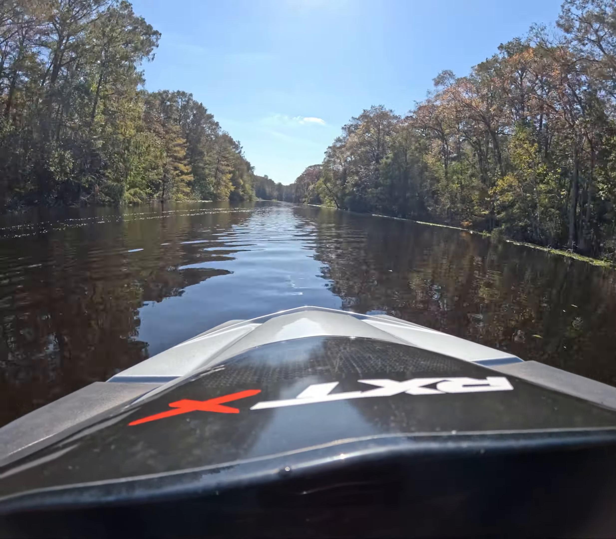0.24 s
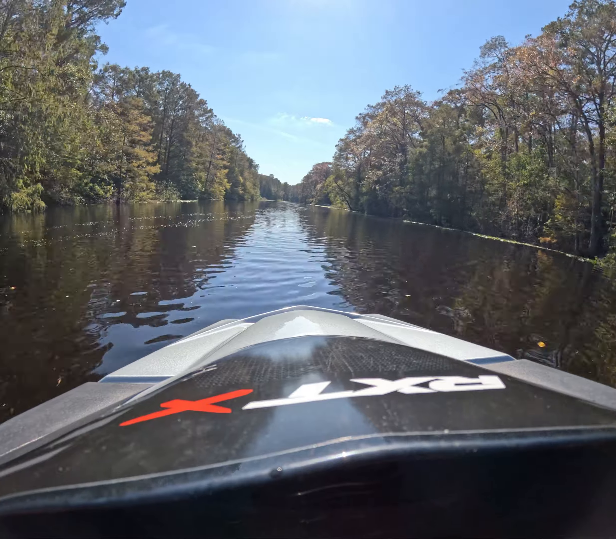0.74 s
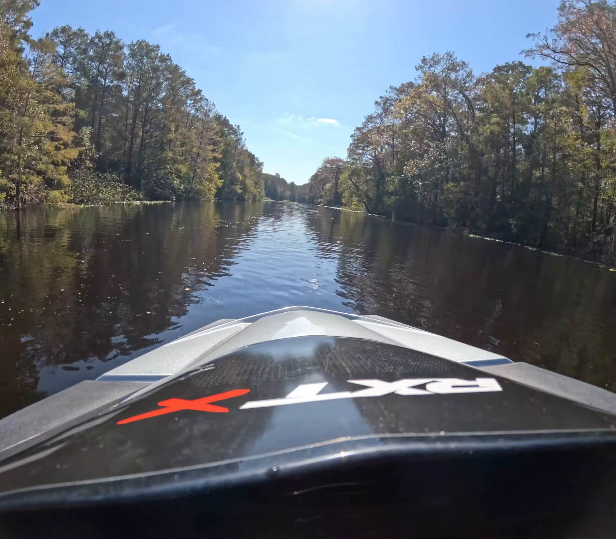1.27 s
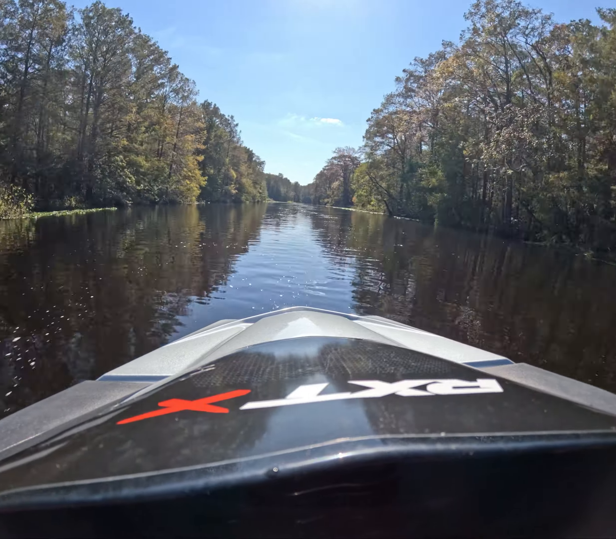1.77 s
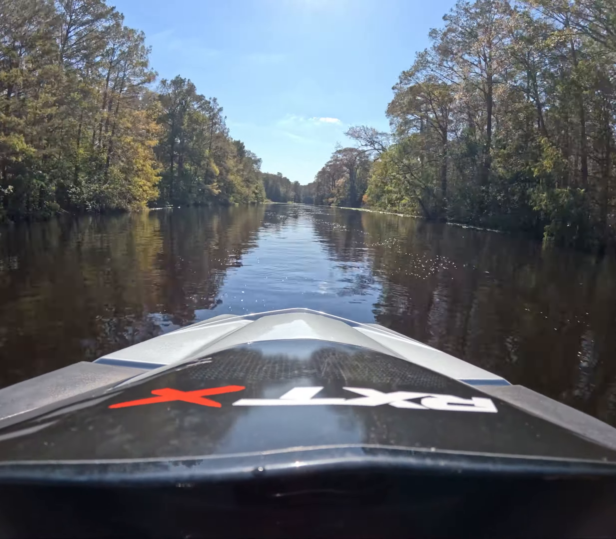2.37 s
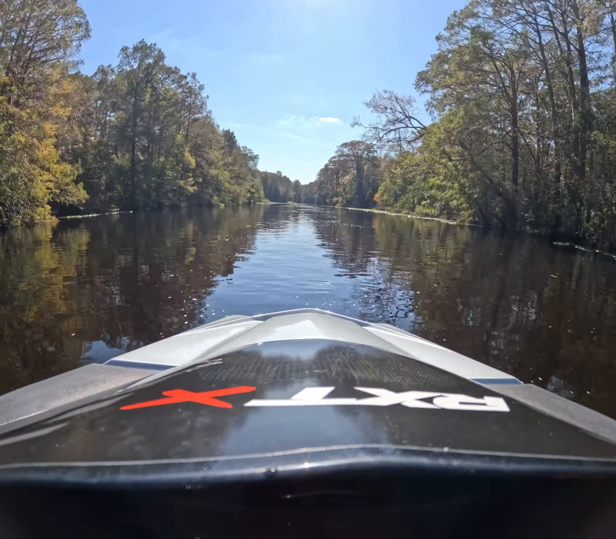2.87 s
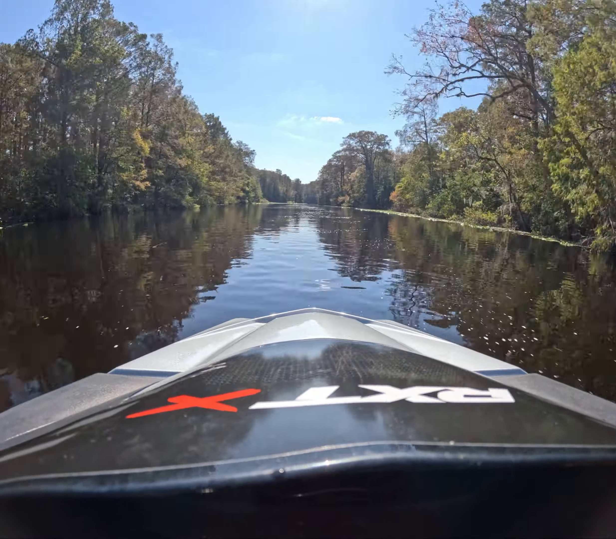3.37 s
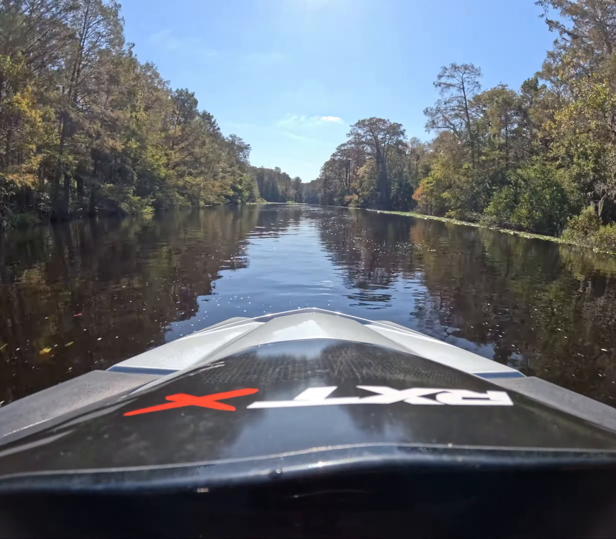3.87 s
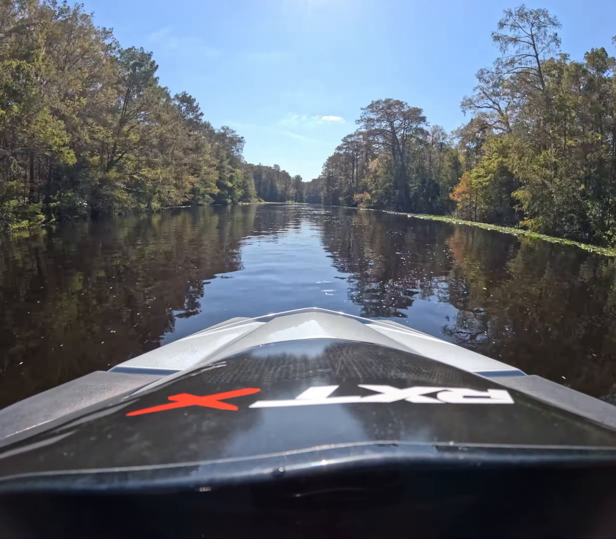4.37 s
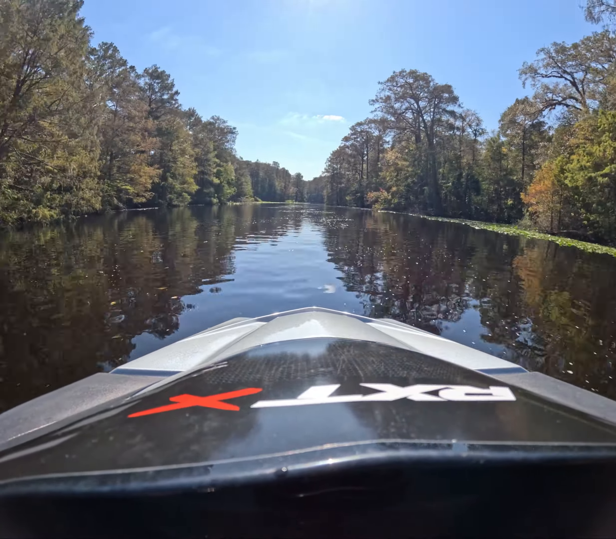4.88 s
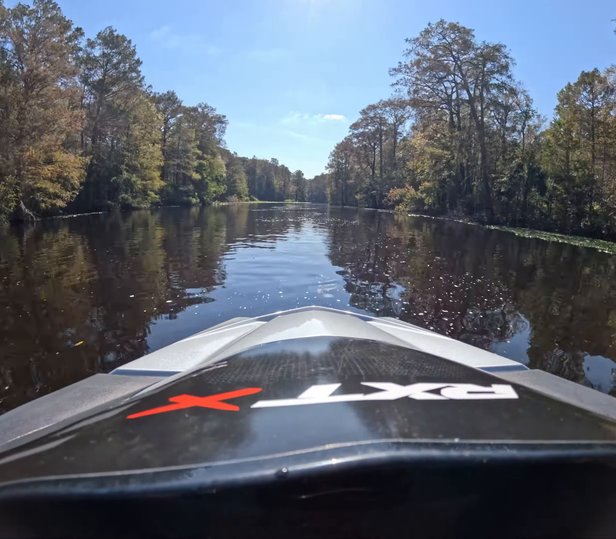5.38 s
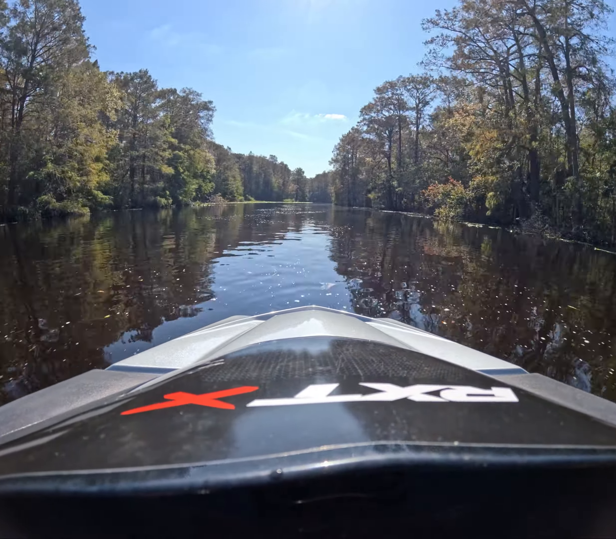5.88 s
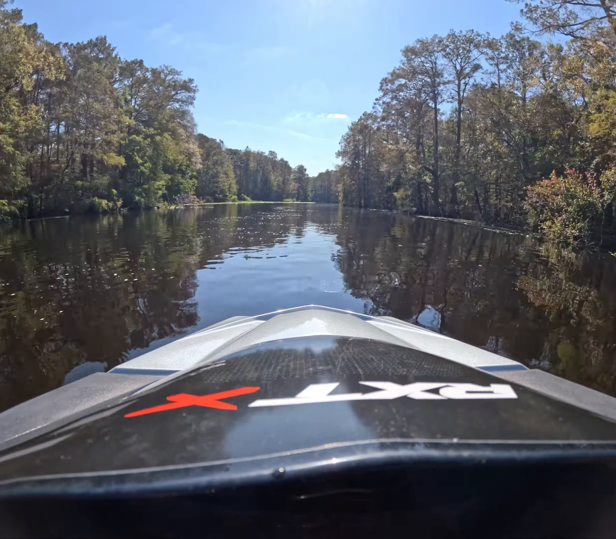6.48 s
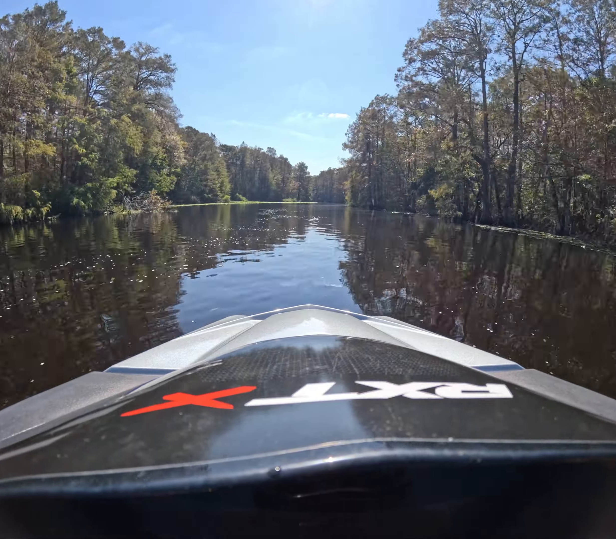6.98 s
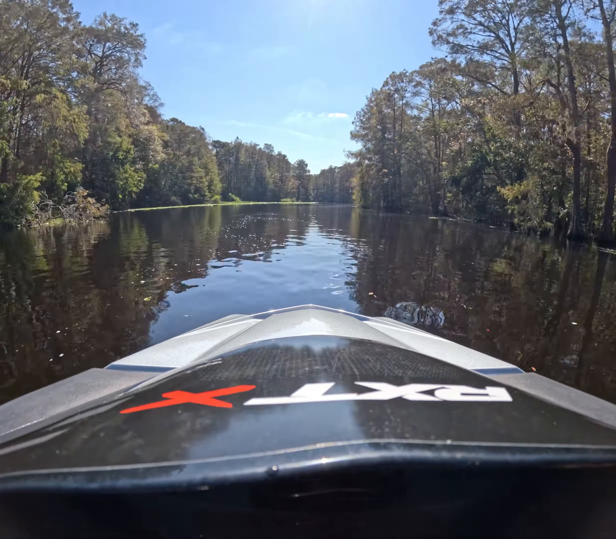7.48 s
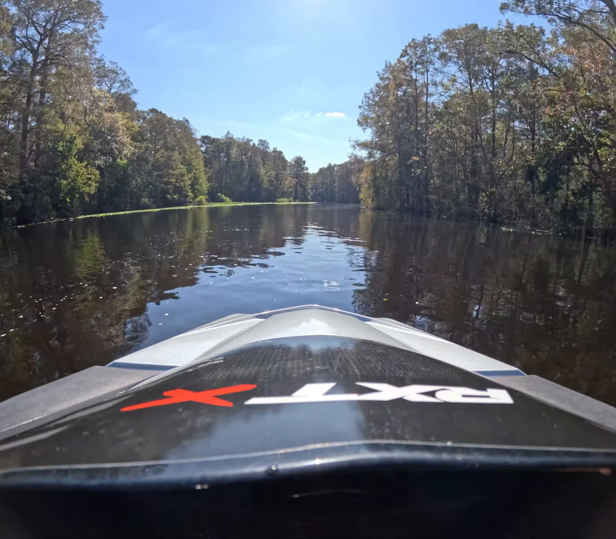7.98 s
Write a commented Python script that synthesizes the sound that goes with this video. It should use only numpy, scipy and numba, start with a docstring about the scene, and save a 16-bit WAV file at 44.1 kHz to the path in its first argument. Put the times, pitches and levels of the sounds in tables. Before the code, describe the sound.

On the deck of a small watercraft moving along a calm river, a close camera microphone hears constant wind buffeting, dull hull drumming, mid-toned rushing water and faint hissing spray. A steady low engine hum sags after two seconds, wavers and recovers, partly masked. Near the end the rush thins, then swells back with a hollow tone as the engine pitch rises slightly. The sound is dense, compressed and level throughout.

```python
"""A jet-driven watercraft planes along a calm river, heard by a small camera fixed to its deck.
From the start, noise bands give wind buffeting, hull drumming, rushing water and spray over the engine.
The engine, a harmonic series, holds near 138 Hz, sags after 2 s and recovers; low hums swell and sink.
From 6.5 s the rush thins, then rises again with a hollow note while the firing rate climbs to 150 Hz.
A fast limiter holds the level throughout."""
import sys
import numpy as np
from scipy import signal
from scipy.fft import rfft, irfft, next_fast_len
from scipy.io import wavfile
from scipy.ndimage import uniform_filter1d
from numba import njit

SR = 44100
rng = np.random.default_rng(int(sys.argv[2]) if len(sys.argv) > 2 else 0)


def store_pcm(level_fs):
    """Save levels as 16-bit WAV."""
    pcm = np.round(np.clip(level_fs, -1, 1) * 32767).astype(np.int16)
    wavfile.write(sys.argv[1], SR, np.atleast_2d(pcm).T)


N = 362943

# All source levels below stand ahead of the input gain in record().
# wind in the microphone port and water on the hull: start_s, buffet_db, drumming_db
WIND_LEVELS = [(0, -22, -23), (1.8, -18.5, -18.5), (2.1, -17, -19), (2.5, -16.5, -21), (2.9, -17, -17.5),
               (3.25, -22, -17), (3.8, -20.5, -18), (5.3, -20, -18), (6.2, -19, -20.5), (6.6, -24.5, -20),
               (7.1, -20, -16), (7.6, -21, -19), (8.23, -19.5, -18.5)]
# water rushing past: start_s, level_db, brightness_db_per_octave
RUSH_LEVELS = [(0, -20, -0.5), (2, -17.5, 0.16), (3.5, -20, 0.9), (4.5, -19, 1), (5.5, -18.5, -0.66),
               (6.47, -19.5, -1.3), (6.56, -22.5, 1), (6.75, -23, 0.5), (6.9, -24, -2.5), (7.05, -24, -1),
               (7.2, -21, -1), (7.35, -21, -1), (7.5, -17, -2), (7.8, -19, -2), (8.23, -17, -2.5)]
# spray: start_s, level_db, brightness_db_per_octave
SPRAY_LEVELS = [(0, -37.5, 2), (.25, -33.5, 0.6), (.55, -27.5, -0.5), (.8, -29.5, 0.5), (1.0, -28, 0),
                (1.25, -30, 0.5), (1.5, -27.5, -0.3), (2.1, -31.5, -0.5), (2.7, -32, -1.5),
                (3.3, -34, -0.3), (3.8, -31, -1), (4.25, -30.5, 0), (4.8, -32.5, -1), (5.3, -32.5, -0.9),
                (6.1, -37, 0.5), (6.33, -38.5, 1.3), (6.45, -33.5, 0), (6.7, -30.5, 0), (6.95, -33, 1),
                (7.2, -31.5, 2), (7.4, -32.5, 0.5), (7.55, -38, 2), (8.23, -36, -0.5)]
# hollow note, a band of the rush added back to it: start_s, band_gain_db
HOLLOW_GAIN = [(0, -25.5), (6.6, -24), (6.9, -7), (7.3, -6), (7.5, -6), (7.65, -10), (7.9, -11),
               (8.23, -20)]
# spectral shapes of the four noises before tilting: frequency_hz, relative_level_db
BUFFET_SPECTRUM = [(12, -20), (25, -6.5), (45, -3), (70, -0.5), (110, -3.5), (170, -13.5), (400, -32.5)]
DRUMMING_SPECTRUM = [(50, -15.5), (110, -2), (170, -0.5), (280, -2.5), (380, -8), (800, -32.5)]
RUSH_SPECTRUM = [(120, -18), (300, -3.5), (450, 0), (850, -0.5), (1300, -3), (1800, -9.5), (2600, -22),
                 (4500, -50)]
SPRAY_SPECTRUM = [(600, -18.5), (1400, -2), (2000, -0.5), (3200, -7.5), (4200, -17), (6000, -28),
                  (7600, -35), (8600, -32), (9400, -37), (11000, -44.5), (13000, -57), (15000, -64.5)]
# engine: start_s, mean_firing_rate_hz, tone_db, octave_db, overtone_base_db, rate_waver_percent
ENGINE_COURSE = [(0, 135.8, -20, -33, -38, 0.4), (.5, 137, -20, -31.5, -30, 0.5),
                 (1.1, 137.9, -19, -33.5, -29.5, 0.5), (1.35, 138, -19.5, -32.5, -36, 0.48),
                 (1.93, 138, -20.5, -35, -37, .8), (2.12, 115.3, -23.5, -40, -41, 3.5),
                 (2.3, 90.8, -31, -43, -43, 5.9), (2.65, 100, -31, -45, -49, 8),
                 (2.85, 138, -26, -38, -36, 4.2), (3.2, 138.2, -26, -39, -37, 1.96),
                 (3.6, 138.1, -31, -41, -46, 1), (4.1, 136.9, -24, -35, -34, 1.02),
                 (4.55, 134.6, -25, -36, -36, 1.54), (4.8, 136, -34, -36, -35, 1.97),
                 (5.3, 137.9, -28, -34, -43, 2), (5.8, 139.5, -33, -38.5, -45, 2.21),
                 (6.4, 140.7, -31, -31, -37, 1.93), (6.8, 142.3, -21.5, -31, -38, 1.06),
                 (7.05, 144.8, -21.5, -35, -35, 0.83), (7.3, 146.9, -22.5, -29.5, -37, 0.83),
                 (7.6, 148.3, -25, -30, -29, 1), (7.8, 149.6, -30, -36, -33, 1.57),
                 (8.23, 145.6, -43.5, -36, -36, 1.4)]
# other overtones: multiple_of_firing_rate, level_above_base_db; halves come from unequal exhaust strokes
ENGINE_OVERTONES = [(1.5, -3.5), (3, -4), (3.5, -9), (4, -5.5), (4.5, -4.5), (5, -6), (6, -11)]
# brief low hums in the rumble: centre_s, mean_pitch_hz, peak_level_db, half_length_s (fall to 1/e)
LOW_HUMS = [(2.55, 63.7, -32, .1), (2.72, 56.9, -27, 0.065), (2.92, 78, -27, 0.094),
            (4.251, 121.6, -27, .08), (5.397, 165.2, -22, 0.14), (5.751, 92.3, -20.5, .12),
            (6.2, 105.1, -24, .15), (6.651, 167.4, -19, 0.11), (7.549, 214.1, -25, 0.087)]

DRUM_BRIGHT_DB = -0.6  # per octave
HOLLOW_HZ, HOLLOW_WIDTH_HZ = 820, 200
INPUT_GAIN_DB, LIMIT_DB, LIMIT_RATIO = 3.5, -14, 2.87
ATTACK_S, RELEASE_S = 0.0016, 0.016
ROUNDING = 0.54  # drive of the soft saturation
TOP_HZ = 14800


def undb(db):
    """Level to amplitude: 20 dB is a factor of ten."""
    return 10 ** (np.asarray(db) / 20)


def curves(table):
    """Linear interpolation in time: each column of a table becomes one value per sample."""
    s, *columns = np.transpose(table)
    return [np.interp(np.arange(N) / SR, s, column) for column in columns]


def walk(rate_hz):
    """Band-limited fluctuation: random steps at the given rate, slewed twice, with unit spread."""
    hold = max(int(SR / rate_hz), 2)
    steps = np.repeat(rng.standard_normal(N // hold + 1), hold)
    smooth = uniform_filter1d(uniform_filter1d(steps, hold), hold)[:N]
    return smooth / smooth.std()


def turbulence(spectrum_table, flutter_db, bright_db, patch_db, patch_hz, fizz_db=0):
    """Turbulence as modulated, coloured noise: half octaves swell independently; rms 1."""
    size = next_fast_len(N)
    eddies = rng.standard_normal(N) * undb(flutter_db)
    octave = np.log2(np.arange(1, size // 2 + 2) * SR / size)
    hz, colour_db = np.transpose(spectrum_table)
    knots = np.log2(hz)
    colour = undb(np.interp(octave, knots, colour_db, left=-150, right=-150))
    spectrum = rfft(eddies, size) * colour
    peak = knots[colour_db.argmax()]
    out = 0
    for centre in np.arange(3.5, 14.5, .5):  # log2 of the band centre in Hz
        if knots[0] - .5 < centre < knots[-1] + .5:
            # overlapping triangles that sum to one
            triangle = np.clip(1 - 2 * abs(octave - centre), 0, 1)
            band = irfft(spectrum * triangle, size)[:N]
            # brightness tilts the spectrum about its peak
            swell_db = bright_db * (centre - peak) + patch_db * walk(patch_hz)
            if fizz_db:
                swell_db = swell_db + fizz_db * walk(420.)
            out = out + band * undb(swell_db)
    return out / out.std()


def wind_and_water():
    """Superposed turbulent noises; rush and spray share the surge and grain of the churned water."""
    buffet_db, drum_db = curves(WIND_LEVELS)
    rush_db, rush_bright_db = curves(RUSH_LEVELS)
    spray_db, spray_bright_db = curves(SPRAY_LEVELS)
    surge, grain = walk(8.), walk(250.)

    buffet = turbulence(BUFFET_SPECTRUM, 0, 0, patch_db=0.59, patch_hz=0.98)
    drumming = turbulence(DRUMMING_SPECTRUM, 0, DRUM_BRIGHT_DB, patch_db=0.36, patch_hz=2.0)
    rush_flutter_db = 0.12 * surge + 0.81 * grain
    rush = turbulence(RUSH_SPECTRUM, rush_flutter_db, rush_bright_db, patch_db=0.24, patch_hz=5.0)
    spray_flutter_db = 0.29 * surge + 0.47 * grain + 0.7 * walk(600.)
    spray = turbulence(SPRAY_SPECTRUM, spray_flutter_db, spray_bright_db,
                       patch_db=0.39, patch_hz=8.5, fizz_db=1.65)

    rush = rush + hollow_note(rush)
    wind = undb(buffet_db) * buffet + undb(drum_db) * drumming
    return wind + undb(rush_db) * rush + undb(spray_db) * spray


def hollow_note(rush):
    """Resonance as a bandpass: a narrow band of the rush is emphasised."""
    edges = HOLLOW_HZ + HOLLOW_WIDTH_HZ * np.array([-.5, .5])
    band = signal.butter(2, edges, "bandpass", fs=SR, output="sos")
    return undb(curves(HOLLOW_GAIN)[0]) * signal.sosfilt(band, rush)


def engine():
    """Periodic firing as a harmonic series; random waver of the rate stands for changing pump load."""
    rate_hz, tone_db, octave_db, base_db, waver = curves(ENGINE_COURSE)
    cycles = np.cumsum(rate_hz * (1 + waver / 100 * walk(14.))) / SR
    out = undb(tone_db + 1.5 * walk(11.)) * np.sin(2 * np.pi * cycles)
    out = out + undb(octave_db + 3.0 * walk(9.)) * np.sin(4 * np.pi * cycles)
    for multiple, db in ENGINE_OVERTONES:
        overtone = np.sin(2 * np.pi * (multiple * cycles + rng.random()))
        out = out + undb(base_db + db + 1.8 * walk(6.)) * overtone
    return np.sqrt(2) * out  # levels are rms


def hums():
    """Gaussian-enveloped sinusoids: short wavering notes swell out of the rumble and sink back."""
    t = np.arange(N) / SR
    wavering_time = np.cumsum(1 + 0.04 * walk(18.)) / SR
    out = np.zeros(N)
    for centre_s, hz, db, half_s in LOW_HUMS:
        swell = undb(db) * np.exp(-((t - centre_s) / half_s) ** 2)
        out = out + np.sqrt(2) * swell * np.sin(2 * np.pi * hz * wavering_time)
    return out


def scene():
    """Linear superposition of all the sources at the microphone."""
    return (wind_and_water() + engine() + hums())[None]


@njit
def limiter(x, threshold, power, attack, release):
    """Envelope-controlled gain: it falls while the envelope stands above the threshold."""
    y, envelope = np.empty(len(x)), threshold
    for i in range(len(x)):
        size = abs(x[i])
        envelope += (size - envelope) * (attack if size > envelope else release)
        y[i] = x[i] * min(threshold / envelope, 1.) ** power
    return y


def record(dry):
    """Compression, saturation and band limiting: the camera holds the level, rounds peaks, cuts the top."""
    attack, release = 1 / (ATTACK_S * SR), 1 / (RELEASE_S * SR)
    power = 1 - 1 / LIMIT_RATIO
    held = limiter(dry[0] * undb(INPUT_GAIN_DB), float(undb(LIMIT_DB)), power, attack, release)
    rounded = np.tanh(ROUNDING * held) / ROUNDING
    lowpass = signal.ellip(8, .2, 70, TOP_HZ, fs=SR, output="sos")
    settled = signal.sosfilt_zi(lowpass) * rounded[0]  # no switch-on step
    return signal.sosfilt(lowpass, rounded, zi=settled)[0][None]


dry = scene()
out = record(dry)
store_pcm(out)
```